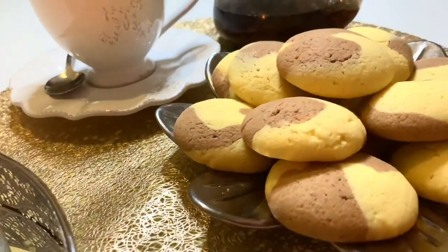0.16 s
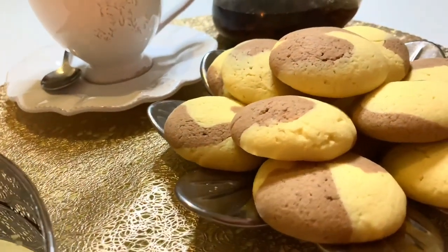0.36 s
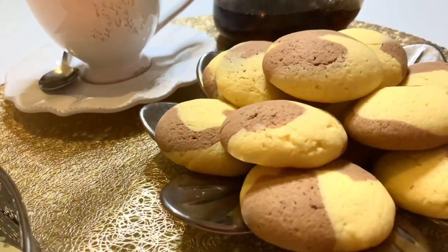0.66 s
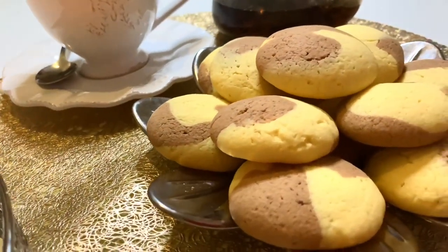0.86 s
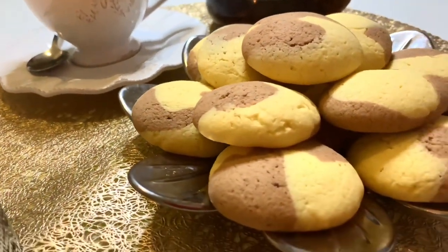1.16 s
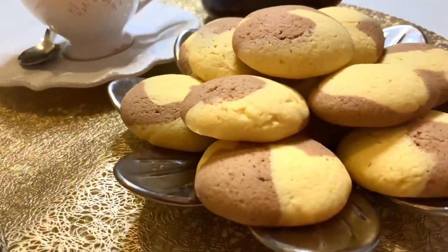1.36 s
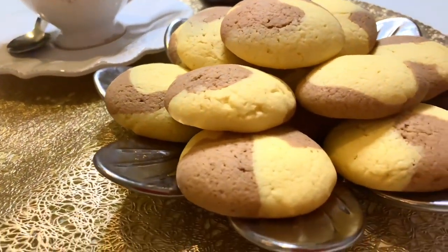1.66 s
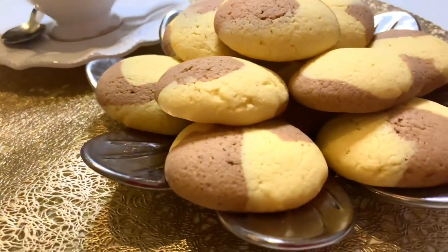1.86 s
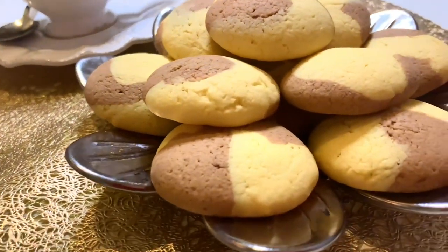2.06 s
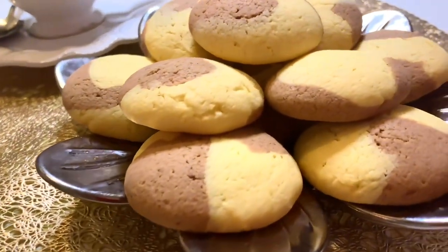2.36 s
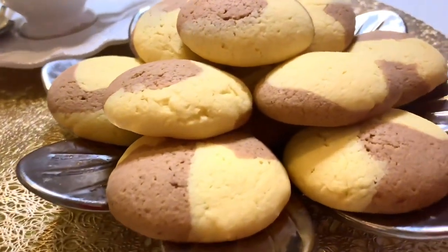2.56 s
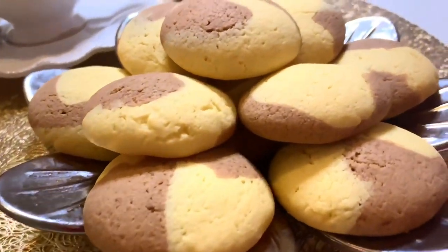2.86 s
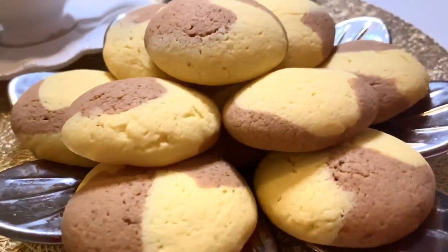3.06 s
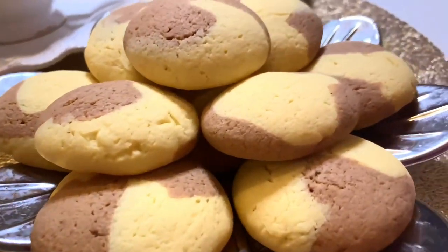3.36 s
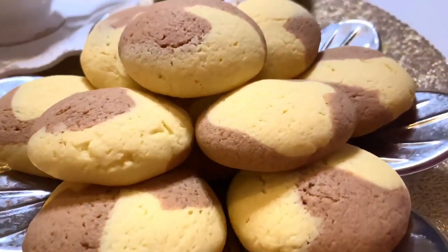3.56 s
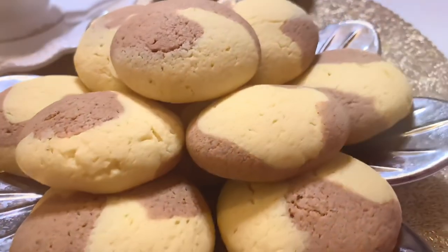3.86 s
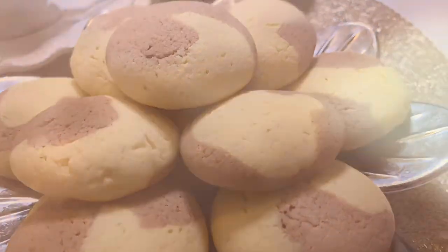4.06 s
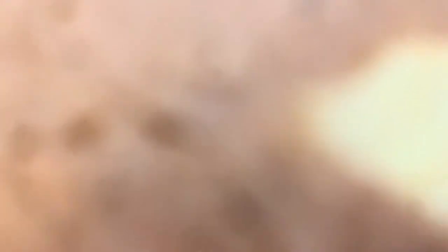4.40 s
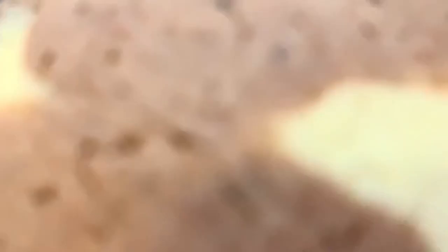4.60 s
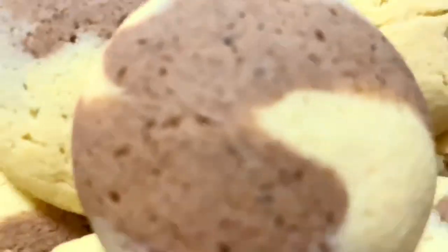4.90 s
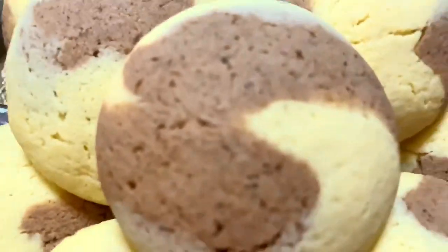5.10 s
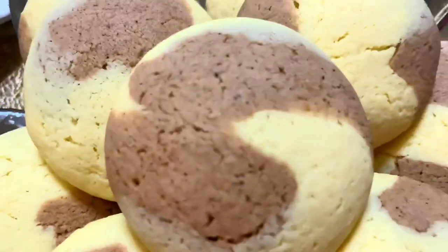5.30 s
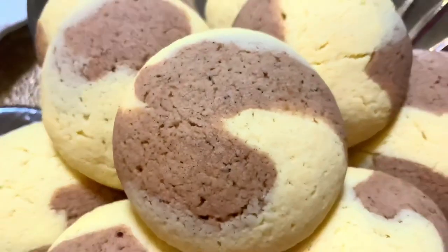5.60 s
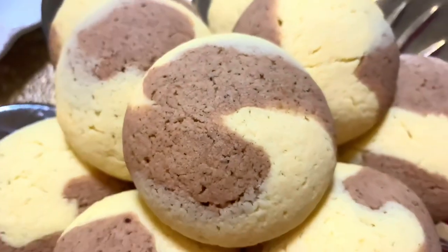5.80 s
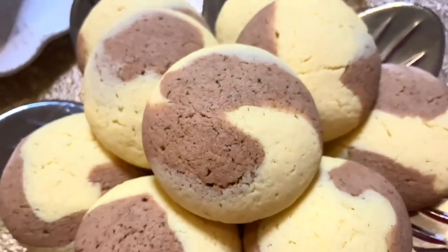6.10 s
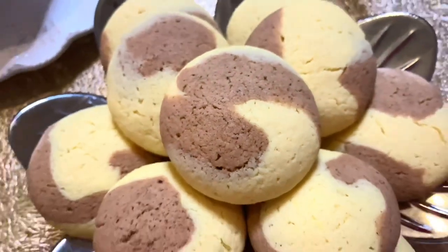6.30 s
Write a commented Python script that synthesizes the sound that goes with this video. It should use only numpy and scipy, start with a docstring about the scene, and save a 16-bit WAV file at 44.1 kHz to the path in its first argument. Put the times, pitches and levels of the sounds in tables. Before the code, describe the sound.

Crisp, irregular wick crackle, closely miked and almost without reverberation, over a constant bass hum. The first part is only light clicks and bright ticks. Then a hard overloaded snap bursts, sputters briefly and fades. A few lesser pops follow, then a dense run of wax pops with sizzling and glassy hollow ringing, before the crackling thins to small snaps.

```python
"""A quiet room, where a candle burns in a glass jar close to the microphone, over a low steady rumble of shaped noise.
The wick ticks and snaps: spikes with quickly dying noise and a faint pitch. Wax pockets pop with a crack,
a cavity ring and a puff of air; the biggest overload the recorder. Around the pops the wax sizzles in
dense noise grains with a hollow ring. Fine frying, a hiss with tiny crackles, fills the gaps."""
import sys
import numpy as np
from scipy import signal
from scipy.fft import rfft, irfft
from scipy.io import wavfile

SR = 44100
rng = np.random.default_rng(int(sys.argv[2]) if len(sys.argv) > 2 else 0)


def transcribe(u):
    """Save the signal u as a 16-bit wav file named by the first command-line argument.

    u: samples, shape (n,) or (channels, n), limited to [-1, 1]; the rate is SR.
    q: integer samples, one column per channel.
    """
    v = np.clip(np.atleast_2d(u).T, -1, 1)
    q = np.round(v * 32767).astype(np.int16)
    wavfile.write(sys.argv[1], SR, q)


N = 284136  # length [samples]

# the clearest snaps of the wick, and at 2.6446 s the strong echo of the loudest pop;
# the top end is relative to the middle of the spectrum:
# (time [s], relative level [dB], top end [dB], ring [Hz])
SNAPS_AND_POP_ECHO = [(0.1262, -14, -4.5, 7700), (0.1754, -12, -12, 6500), (0.2315, -36.5, 12.5, 13100),
                      (0.4232, -17, -7, 6240), (0.451, -27, 7, 7200), (0.4822, -27.5, 1.5, 2070),
                      (0.5594, -22, 6.5, 6470), (0.689, -39.5, 16, 10500), (0.7762, -24, -3, 3370),
                      (0.8462, -27.5, -2, 5030), (0.8762, -30, 8, 11200), (0.9078, -24.5, 6.5, 10300),
                      (1.0614, -25.5, -0.5, 7140), (1.1204, -15, -11, 3030), (1.2367, -26, 3, 7400),
                      (1.2951, -32.5, 8.5, 11400), (1.3666, -28.5, -6, 4260), (1.481, -26, -5.5, 9300),
                      (1.505, -26.5, -0.5, 5070), (1.6985, -16.5, 2.5, 6720), (1.9572, -18, 8.5, 1550),
                      (2.1451, -17, 6, 9530), (2.186, -8.5, -6, 6440), (2.2931, -25, -6, 7350),
                      (2.3527, -17, -7.5, 7000), (2.5654, -17.5, -0.5, 7300), (2.6446, -4, -17, 2860),
                      (2.8482, -27, 2, 6500), (3.0038, -16, -6, 2080), (3.07, -37, 15.5, 10400),
                      (3.6225, -23.5, 1.5, 5820), (3.6833, -26.5, 0, 6500), (3.7073, -8, -3.5, 2890),
                      (3.8236, -10, -34, 3070), (3.9935, -23, 4.5, 6470), (4.1084, -36, 14.5, 10900),
                      (4.248, -30.5, -15, 2830), (4.4329, -28, 1, 10940), (4.6811, -30.5, 3.5, 11100),
                      (4.8118, -15, 1, 10400), (5.1097, -21, -4, 2730), (5.2375, -7.5, -6.5, 3200),
                      (5.2527, -13.5, -6.5, 6900), (5.5672, -14, 0, 3400), (5.7546, -17, -1.5, 4300),
                      (5.8055, -12.5, -4.5, 3800), (5.9499, -24.5, -1, 4100), (6.0053, -17, -9, 8040),
                      (6.0716, -19.5, -7, 3140), (6.12, -19, -1, 6700), (6.2807, -38, 14, 10200)]
# bursting wax pockets; the ends are relative to the middle of the spectrum, spit to the scatter of the crack:
# (time [s], relative level [dB], low end [dB], top end [dB], ring [Hz], air puff [dB], spit [dB])
WAX_POPS = [(2.6357, 17.5, -7, -24.5, 3100, -25.5, -16), (3.152, -6.5, 5.5, 0, 1640, -47, -46),
            (3.384, -0.5, 2, -11.5, 2900, -26.5, -18), (4.4718, 10.5, -7, 0.5, 6800, -48, -23),
            (4.8229, 5.5, -6, -13, 2310, -45, -37), (4.8801, 4, 4.5, -12, 1720, -47, -30),
            (4.9322, 4.5, -3, -6.5, 6450, -49, -10.5), (4.9849, -4, 11.5, -5.5, 1360, -22, -9.5),
            (5.0804, 7, -1.5, -9, 6610, -15.5, -9.5), (5.3851, 6, 6, -16, 2400, -14.5, -11),
            (5.5353, 5.5, 6.5, -11.5, 2340, -16.5, -13)]
# spells of sizzling wax; the jar ring is relative to the fizz:
# (time [s], fade time scale [s], level [dB], jar ring [dB])
WAX_SIZZLES = [(2.681, 0.057, -55, 0.5), (3.387, 0.073, -59, -21), (4.971, .08, -59, -12),
               (5.079, 0.05, -56, -1), (5.28, 0.17, -70, -12), (5.453, 0.1, -68, 6.5),
               (5.519, 0.05, -54, 4.5)]
# base level of the flame's fine frying: (time [s], level [dB])
FRYING_LEVEL = [(0.0, -69), (0.29, -71.5), (0.66, -71), (1.81, -71), (2.64, -67.5), (4.29, -74),
                (4.84, -69), (4.97, -66.5), (5.38, -64), (5.85, -70.5), (6.44, -69.5)]
# how briskly the wick crackles, as crackle level and rate of faint ticks: (time [s], liveliness [dB])
WICK_LIVELINESS = [(0, -2), (0.9, 4), (1.5, -0.5), (1.8, -7), (2.7, -5), (3.8, -1), (4.2, -4), (5.3, 0),
                   (6.44, 2)]
# colour that all snaps and pops share: (frequency [Hz], gain [dB])
CRACK_COLOUR = [(320, 0.5), (810, -5.5), (1370, -2), (2060, 1), (3000, 0), (4500, -1.5), (6600, 2),
                (9800, -1), (14300, -0.5)]
# how wide the cracks are between the two microphone ports: (frequency [Hz], side relative to mid [dB])
CRACK_WIDTH = [(700, -23), (2400, -22), (4400, -12.5), (8100, -8), (15000, -5.5)]
# noise spectra, each scaled to an rms of one before its level: (frequency [Hz], relative level per Hz [dB])
RUMBLE_SPECTRUM = [(12, -51), (20, -14.5), (48, 0), (75, 2), (95, -3), (125, -7.5), (209, -17),
                   (329, -22.5), (455, -29.5), (797, -38.5), (1500, -48), (3300, -65.5)]
HISS_SPECTRUM = [(700, -0.5), (1100, 0), (1750, -5.5), (3000, -1.5), (4300, -4), (5400, -5), (6600, 1),
                 (8700, -7), (10800, 0.5), (13500, -6), (15800, -7)]
CRACKLE_SPECTRUM = [(700, 4.5), (1500, 0), (3000, -3), (6500, -4.5), (11000, -2), (15800, -14)]
SIZZLE_SPECTRUM = [(700, 0), (1500, 5.5), (2500, 2.5), (5000, 1), (8000, -0.5), (11000, -8), (16000, -16)]
# left-right likeness of the noise layers: (frequency [Hz], correlation [-1 to 1])
LIKENESS = [(25, 0.99), (100, 0.98), (1800, 1), (3000, 1), (4500, 0.98), (6600, 0.99), (9800, 0.58),
            (14000, 0.96)]
# nearby surfaces, before the room's band-pass: (delay [ms], level [dB])
ECHOES = [(8.8, -27.5), (16.3, -58)]

BURST_SIZE = 1024  # samples
# a bubble that rings higher is smaller: it has less low end and, among the faint ticks, more top end
BUBBLE_HZ, LOW_END_DB, LOW_DB_PER_OCTAVE, TOP_DB_PER_OCTAVE = 6500, -7.5, -5.5, 6.5


def from_db(db):
    """Turn decibels into an amplitude factor."""
    return 10 ** (np.asarray(db) / 20)


def rms_one(x):
    """Scale to an rms of one."""
    return x / np.sqrt(np.mean(x ** 2) + 1e-20)


def unit_energy(x):
    """Scale each row to an energy of one."""
    return x / np.sqrt(np.sum(x ** 2, axis=-1, keepdims=True) + 1e-20)


def at_hz(points, hz):
    """Read a table on a log-frequency axis."""
    table_hz, value = np.transpose(points)
    return np.interp(np.log(np.maximum(hz, 1)), np.log(table_hz), value)


def in_time(curve, s):
    """Read a curve at the times s."""
    return np.interp(s, *np.transpose(curve))


def add(out, s, sound):
    """Mix a sound in at time s."""
    start = int(round(s * SR))
    out[:, start:start + sound.shape[-1]] += sound[..., :N - start]


def left_right(mid, side, hz):
    """Set how alike the left and right channels are at each frequency by balancing mid and side."""
    alike = np.clip(at_hz(LIKENESS, hz), 0, 1)
    mid = np.sqrt((1 + alike) / 2) * mid
    side = np.sqrt((1 - alike) / 2) * side
    return np.array([mid + side, mid - side])


def coloured(pair, spectrum):
    """Give two unrelated signals a spectrum and a stereo image; rms one."""
    hz = np.fft.rfftfreq(N, 1 / SR)
    mid, side = rfft(pair) * from_db(at_hz(spectrum, hz))
    return rms_one(irfft(left_right(mid, side, hz), N))


def grains(per_s, spread_db, decay_s):
    """Random tiny bursts of uneven size: decaying energy from each impact shapes two unrelated noises."""
    sizes = from_db(spread_db * np.minimum(rng.exponential(1, N), 3.5))
    born = rng.random(N) < per_s / SR
    energy_kept = np.exp(-2 / (decay_s * SR))  # per sample
    power = signal.lfilter([1], [1, -energy_kept], born * sizes ** 2 + 1e-18)
    return np.sqrt(power) * rng.standard_normal((2, N))


def bursts(decay_ms, spike, spit_db, spit_ms=5.9):
    """A sharp spike, its quickly dying scatter and a softer spit: (mid or side, events, samples)."""
    ms = np.arange(BURST_SIZE) / SR * 1000
    noise = rng.standard_normal((len(decay_ms), 2, 2, BURST_SIZE))
    scatter, spit = noise.transpose(1, 2, 0, 3)
    burst = unit_energy(scatter * np.exp(-ms / decay_ms[:, None]))
    burst += from_db(spit_db)[..., None] * unit_energy(spit * np.exp(-ms / spit_ms))
    burst[0, :, 0] += spike  # in mid only
    return burst


def tilt(hz, low_db, top_db, low_hz=1400, middle_hz=3800, top_hz=10500):
    """Gain in dB on the way from the middle of the spectrum to its low or top end."""
    toward_low = at_hz([(low_hz, 1), (middle_hz, 0)], hz)
    toward_top = at_hz([(middle_hz, 0), (top_hz, 1)], hz)
    return low_db * toward_low + top_db * toward_top


def voiced(burst, level_db, low_db, top_db):
    """Set each burst's energy and width band by band, so every event has its own tilt."""
    edges = [170, 600, 1100, 1700, 2500, 3700, 5500, 8000, 12000, 16000]  # Hz
    out = 0
    for k, (low, high) in enumerate(zip(edges, edges[1:])):
        hz = np.sqrt(low * high)
        band_pass = signal.butter(2, [low, high], "band", fs=SR, output="sos")
        band = signal.sosfilt(band_pass, burst + 1e-18)
        # energy follows bandwidth; neighbouring bands have opposite polarity
        mid, side = unit_energy(band) * np.sqrt(2 * (high - low) / SR) * (-1) ** k
        gain = from_db(level_db + tilt(hz, low_db, top_db) + at_hz(CRACK_COLOUR, hz))
        width = from_db(at_hz(CRACK_WIDTH, hz))
        stereo = np.array([mid + width * side, mid - width * side])
        out = out + stereo * gain[:, None] / np.hypot(1, width)
    return out


def cavity(hz, decay_ms):
    """The brief ring of a burst bubble: a decaying sine."""
    t = np.arange(BURST_SIZE) / SR
    return np.sin(2 * np.pi * hz * t) * np.exp(-t * 1000 / decay_ms)


def rumble(level_db=-43.5):
    """A low steady rumble: noise with most of its energy in the bass."""
    return from_db(level_db) * coloured(rng.standard_normal((2, N)), RUMBLE_SPECTRUM)


def frying(hiss_db=0.5, crackle_db=3.5):
    """The flame's smooth hiss carries a scatter of faint crackles, stronger while the wick is lively."""
    t = np.arange(N) / SR
    hiss = from_db(hiss_db) * coloured(rng.standard_normal((2, N)), HISS_SPECTRUM)
    crackle_grains = grains(per_s=110, spread_db=6.0, decay_s=0.0015)
    crackle = from_db(crackle_db) * coloured(crackle_grains, CRACKLE_SPECTRUM)
    liveliness = from_db(in_time(WICK_LIVELINESS, t))
    return from_db(in_time(FRYING_LEVEL, t)) * (hiss + liveliness * crackle)


def faint_ticks(count=44, level_db=-33.0, spread_db=2.5, low_hz=4500, high_hz=13000, db_per_octave=-4.0):
    """Random ticks, denser while the wick is lively; small bubbles are quieter and brighter. Snap rows."""
    when, size, strength = rng.random((count, 3)).T
    t = np.arange(N) / SR
    # equal steps of accumulated liveliness are equally likely to hold a tick
    burnt = np.cumsum(from_db(in_time(WICK_LIVELINESS, t)))
    s = np.interp(when * burnt[-1], burnt, t)
    ring_hz = low_hz * (high_hz / low_hz) ** size
    octaves = np.log2(ring_hz / BUBBLE_HZ)
    db = level_db + db_per_octave * octaves + spread_db * (2 * strength - 1)
    return np.transpose([s, db, TOP_DB_PER_OCTAVE * octaves, ring_hz])


def snaps(decay_ms=0.96, spike=0.86, spit_db=-13.0, gain_db=-0.34, ring_db=-17.5, ring_ms=1.0):
    """Dry wick ticks and one pop's echo, each a burst plus a faint pitch; a higher ring has less low end."""
    s, level_db, top_db, ring_hz = np.vstack([SNAPS_AND_POP_ECHO, faint_ticks()]).T
    low_db = LOW_END_DB + LOW_DB_PER_OCTAVE * np.log2(ring_hz / BUBBLE_HZ)
    raw = bursts(np.full(len(s), decay_ms), spike, spit_db)
    ticks = voiced(raw, level_db + gain_db, low_db, top_db)
    ring_gain = from_db(level_db + tilt(ring_hz, low_db, top_db) + ring_db)
    out = np.zeros((2, N))
    for k, start in enumerate(s):
        add(out, start, ticks[:, k] + ring_gain[k] * cavity(ring_hz[k], ring_ms))
    return out


def pops(decay_ms=1.18, spike=0.58, gain_db=0.97, ring_db=-18.5, puff_hz=62, puff_ms=3.56, puff_lag_ms=3.11):
    """A wax pocket bursts: a crack, a brief ring of the cavity, then a slow puff of air."""
    s, level_db, low_db, top_db, ring_hz, puff_db, spit_db = np.transpose(WAX_POPS)
    raw = bursts(np.full(len(s), decay_ms), spike, spit_db)
    cracks = voiced(raw, level_db + gain_db, low_db, top_db)
    ring_gain = from_db(level_db + tilt(ring_hz, low_db, top_db) + ring_db)
    t = np.arange(2 * BURST_SIZE) / SR
    swell = t * 1000 / puff_ms  # the envelope peaks at puff_ms
    # the lag shifts the phase of the wave, not its envelope
    puff_wave = np.sin(2 * np.pi * puff_hz * (t - puff_lag_ms / 1000))
    puff = swell * np.exp(1 - swell) * puff_wave
    sharp, air = np.zeros((2, 2, N))
    for k, start in enumerate(s):
        add(sharp, start, cracks[:, k] + ring_gain[k] * cavity(ring_hz[k], decay_ms))
        add(air, start, from_db(puff_db[k]) * puff)
    return sharp, air


def sizzles(rise_s=0.0061, fade=1.0, ring_fade=0.55, jar_hz=3080, jar_q=4.7):
    """Sputtering fizz starts quickly and dies away; a resonance gives a hollow ring that lingers longer."""
    t = np.arange(N) / SR
    fizz_level, ring_level = np.zeros((2, N))
    for s, length, level_db, ring_db in WAX_SIZZLES:
        age = np.maximum(t - s, 0)
        onset = from_db(level_db) * (1 - np.exp(-age / rise_s))
        fizz_level += onset * np.exp(-fade * (age / length) ** 2)
        ring_level += onset * from_db(ring_db) * np.exp(-ring_fade * (age / length) ** 2)
    fizz = coloured(grains(per_s=1500, spread_db=3.5, decay_s=0.002), SIZZLE_SPECTRUM)
    sputter = coloured(grains(per_s=670, spread_db=5.5, decay_s=0.002), SIZZLE_SPECTRUM)
    b, a = signal.iirpeak(jar_hz, jar_q, fs=SR)
    ring = rms_one(signal.lfilter(b, a, sputter))
    return fizz_level * fizz + ring_level * ring


def room(x, tail_db=-46, t60_s=0.3, wall_hz=7000, scatter_s=0.00018):
    """Slightly scattered early echoes and a faint, dull noise tail, convolved with the dry sound."""
    t = np.arange(SR // 2) / SR
    tail = rng.standard_normal((2, len(t))) * from_db(-60 * t / t60_s)
    response = from_db(tail_db) * unit_energy(tail)
    for delay_ms, echo_db in ECHOES:
        noise = rng.standard_normal((2, BURST_SIZE))
        scatter = unit_energy(noise * np.exp(-t[:BURST_SIZE] / scatter_s))
        add(response, delay_ms / 1000, from_db(echo_db) * scatter)
    band_pass = signal.butter(1, [900, wall_hz], "band", fs=SR, output="sos")
    response = signal.sosfilt(band_pass, response)
    return x + signal.fftconvolve(x, response, axes=1)[:, :N]


def scene():
    """Snaps and cracks in the room, with the puffs, frying, sizzles and rumble mixed in directly."""
    cracks, air = pops()
    return room(cracks + snaps()) + air + frying() + sizzles() + rumble()


def record(dry, overload=0.1, cutoff_hz=16000):
    """The recorder overloads smoothly, flattening the loudest peaks, then the top is cut."""
    clipped = dry / (1 + (dry / overload) ** 6) ** (1 / 6)
    low_pass = signal.ellip(10, 0.2, 80, cutoff_hz, fs=SR, output="sos")
    return signal.sosfilt(low_pass, clipped)


dry = scene()
out = record(dry)
transcribe(out)
```